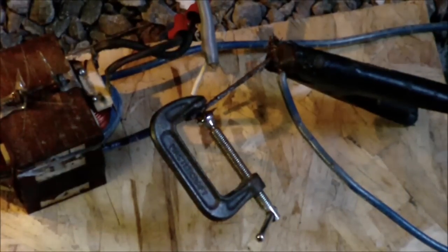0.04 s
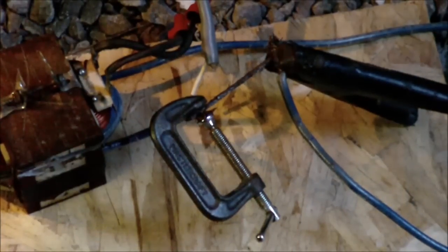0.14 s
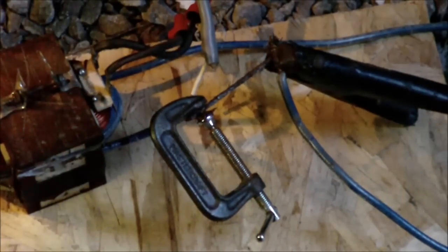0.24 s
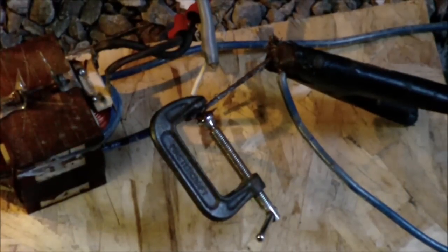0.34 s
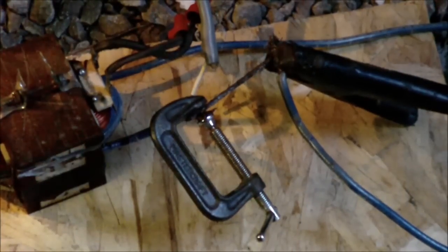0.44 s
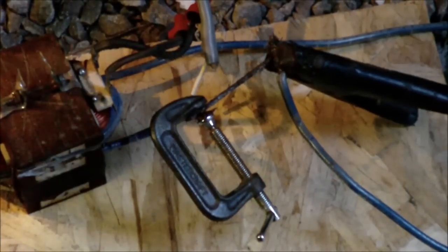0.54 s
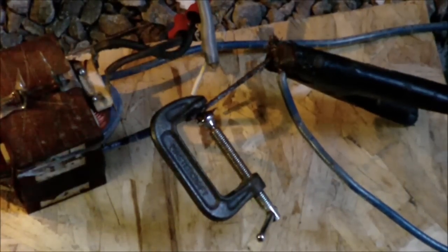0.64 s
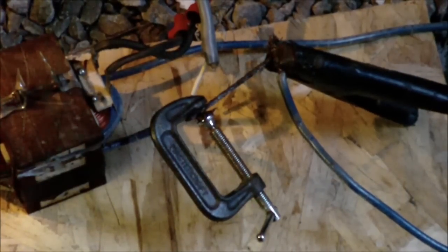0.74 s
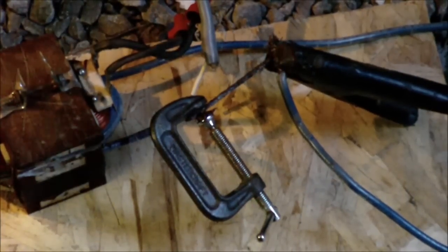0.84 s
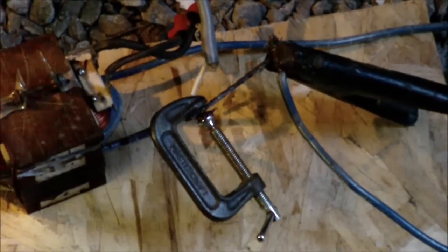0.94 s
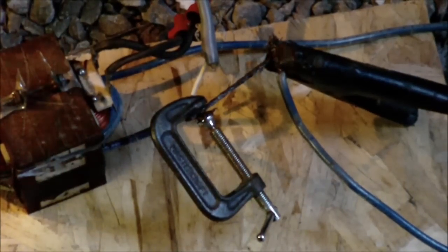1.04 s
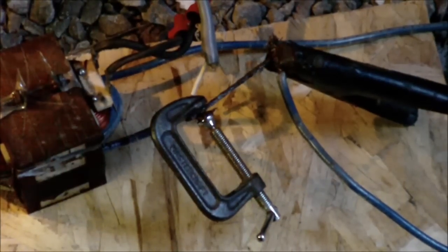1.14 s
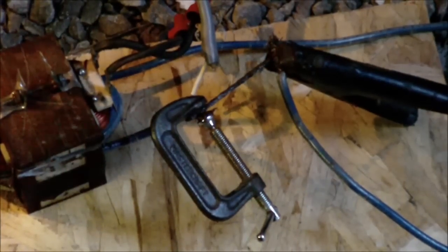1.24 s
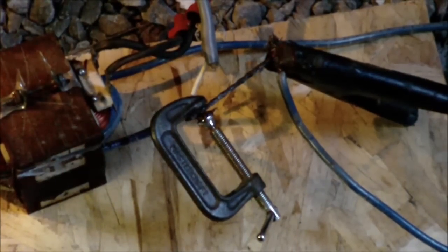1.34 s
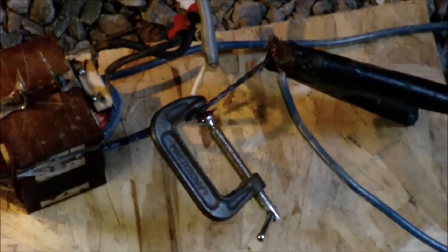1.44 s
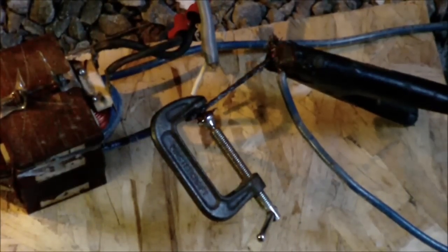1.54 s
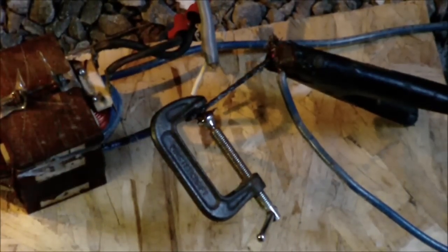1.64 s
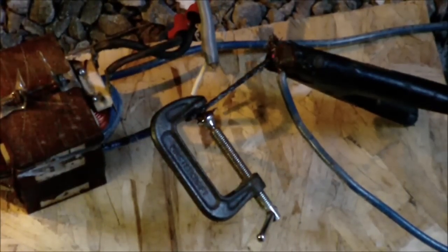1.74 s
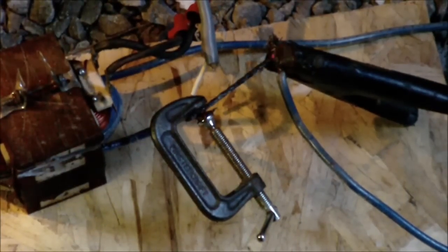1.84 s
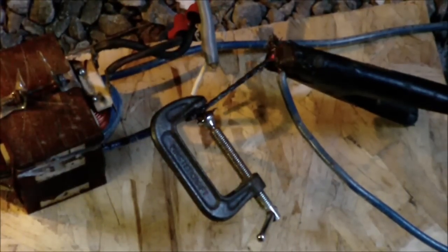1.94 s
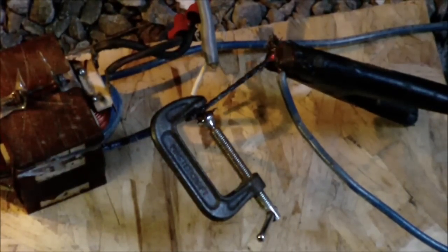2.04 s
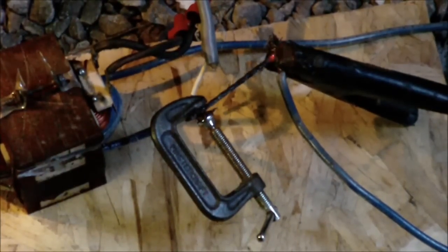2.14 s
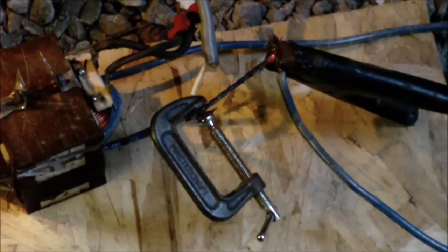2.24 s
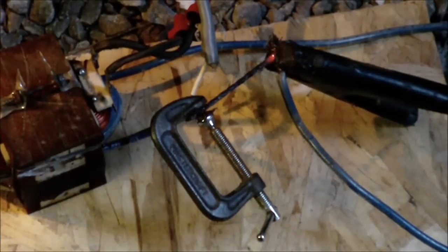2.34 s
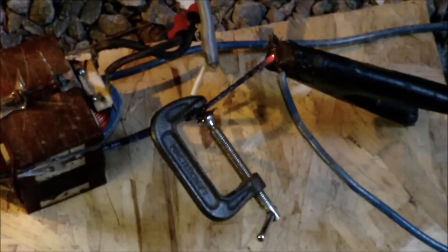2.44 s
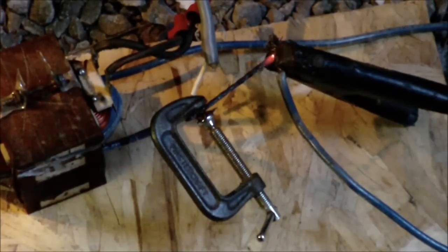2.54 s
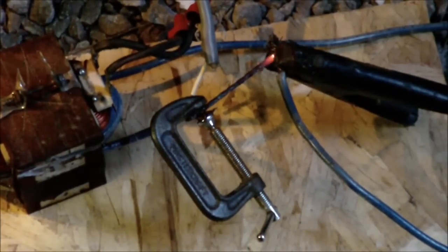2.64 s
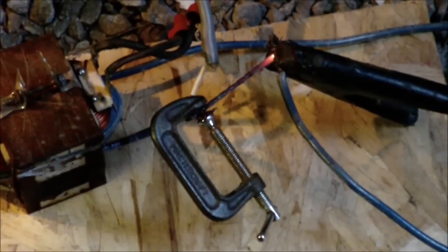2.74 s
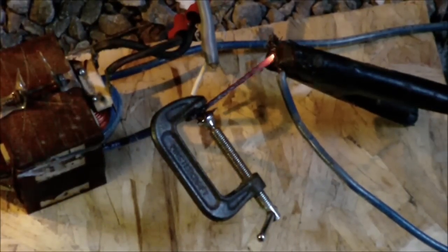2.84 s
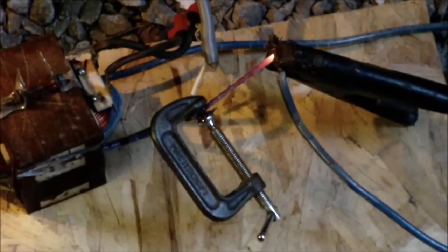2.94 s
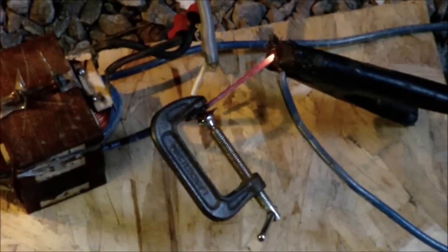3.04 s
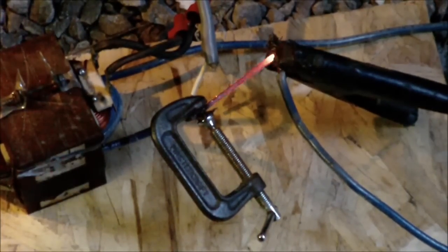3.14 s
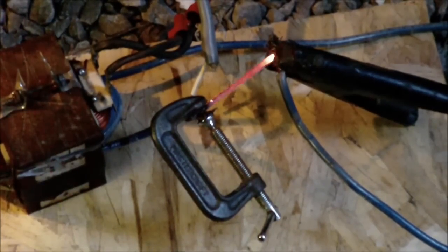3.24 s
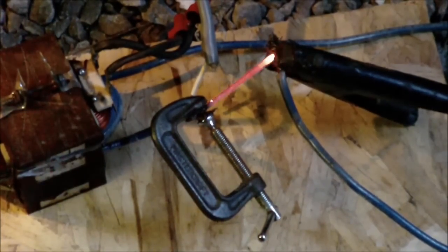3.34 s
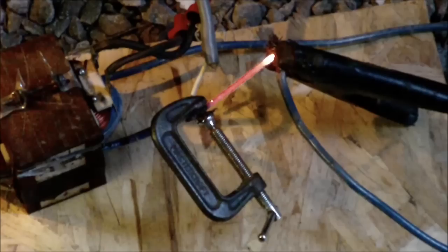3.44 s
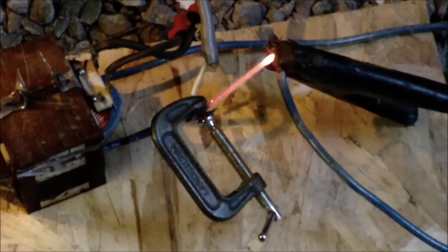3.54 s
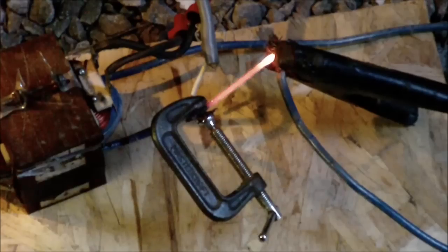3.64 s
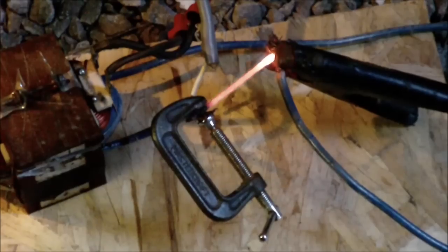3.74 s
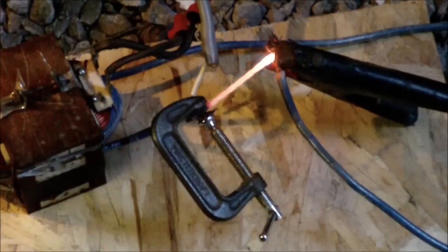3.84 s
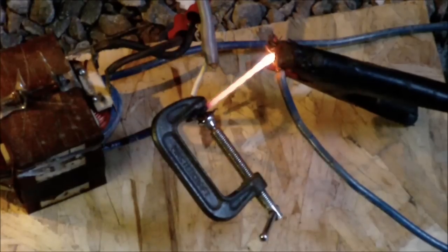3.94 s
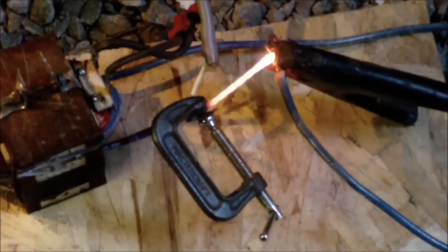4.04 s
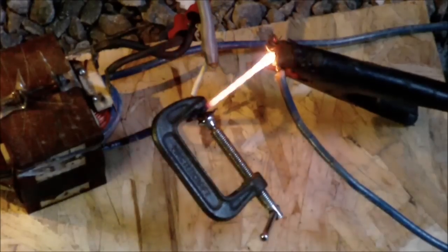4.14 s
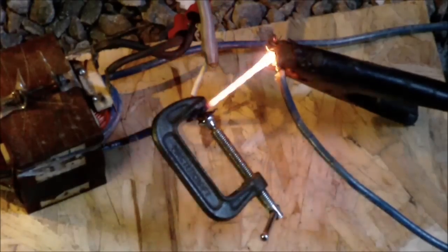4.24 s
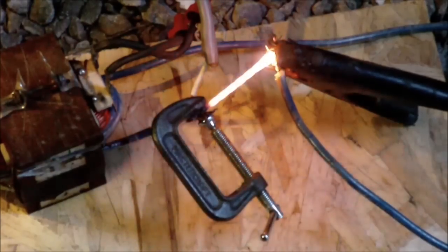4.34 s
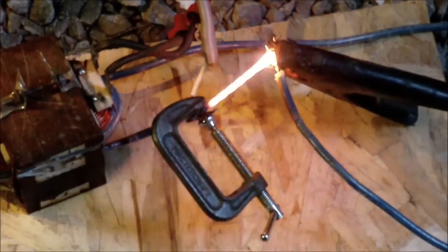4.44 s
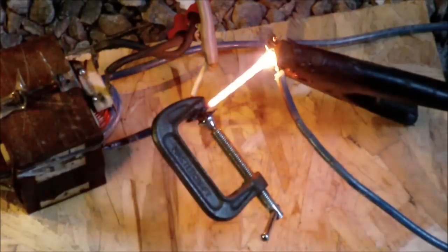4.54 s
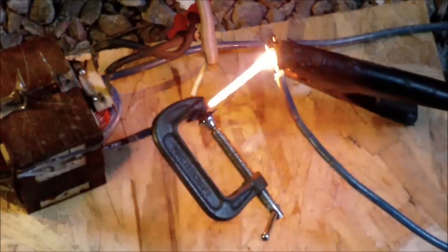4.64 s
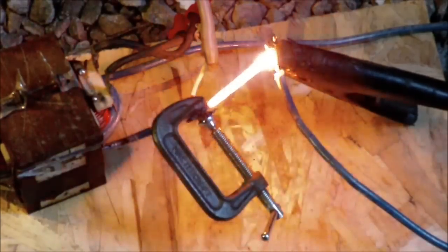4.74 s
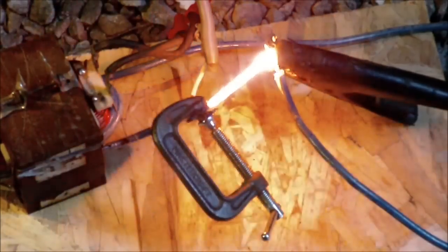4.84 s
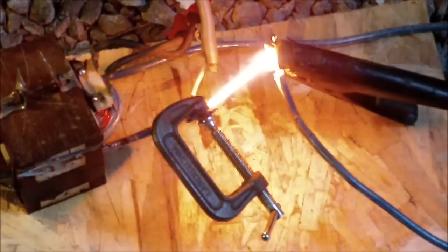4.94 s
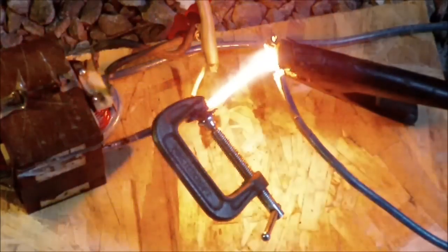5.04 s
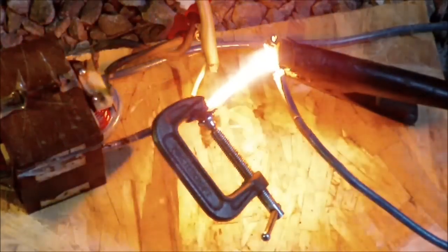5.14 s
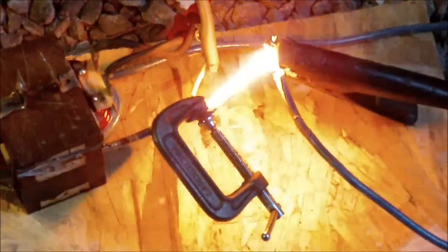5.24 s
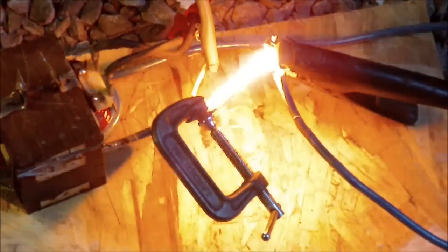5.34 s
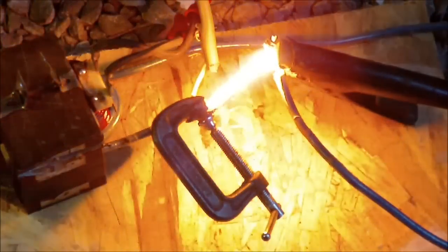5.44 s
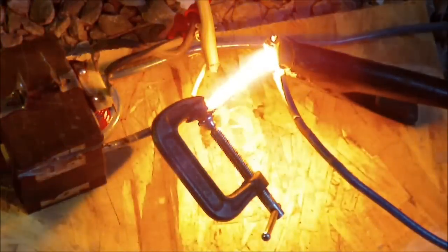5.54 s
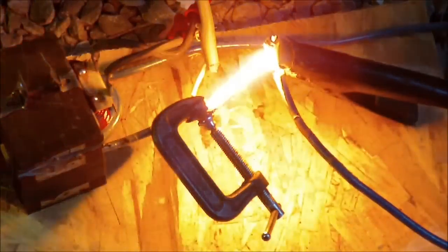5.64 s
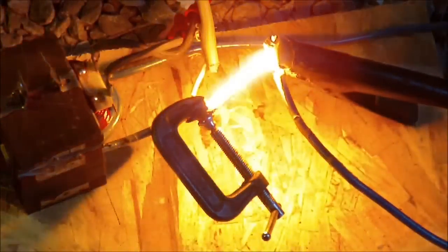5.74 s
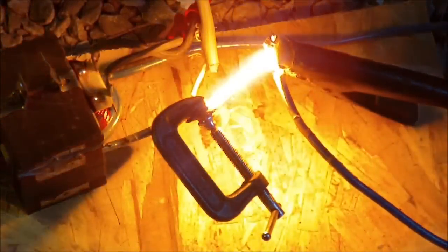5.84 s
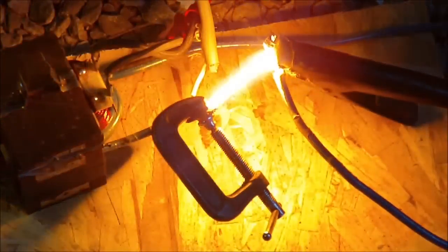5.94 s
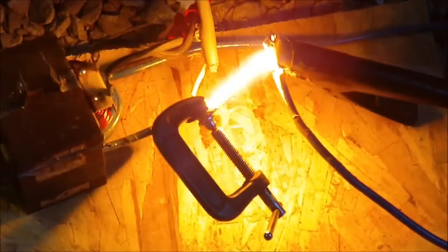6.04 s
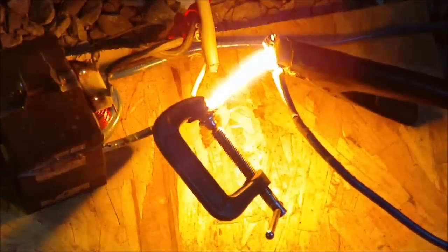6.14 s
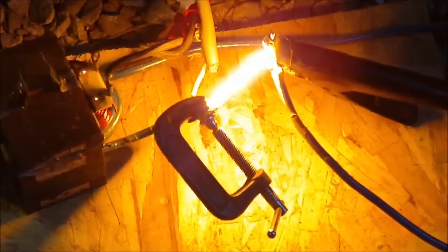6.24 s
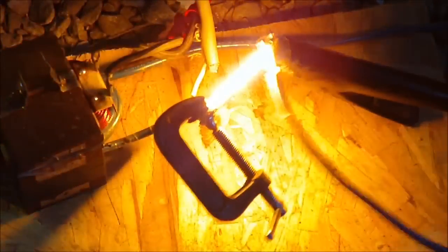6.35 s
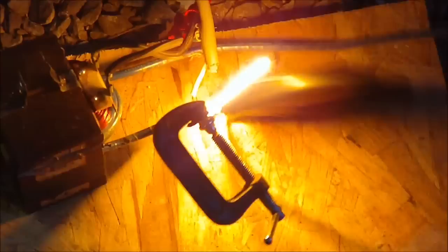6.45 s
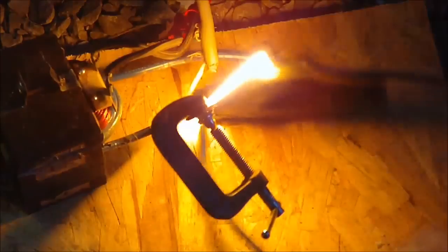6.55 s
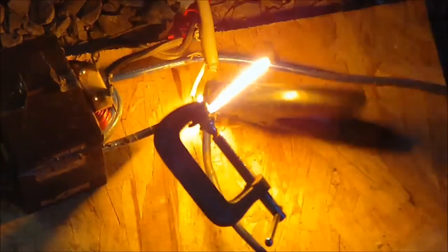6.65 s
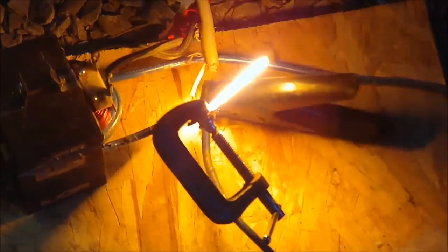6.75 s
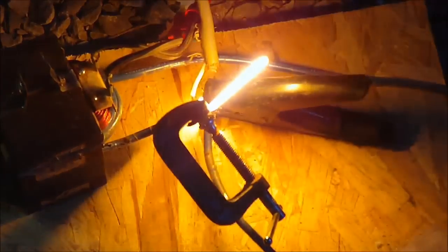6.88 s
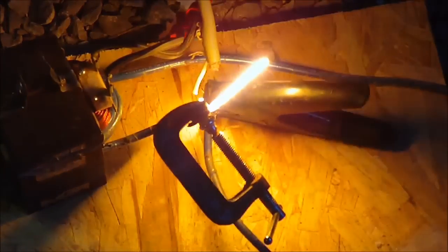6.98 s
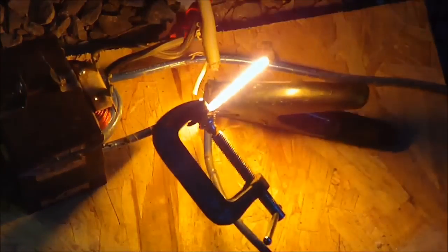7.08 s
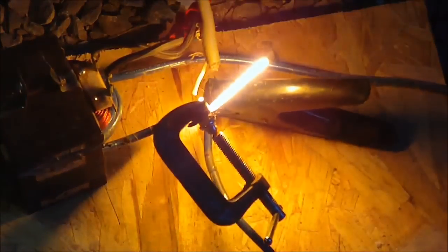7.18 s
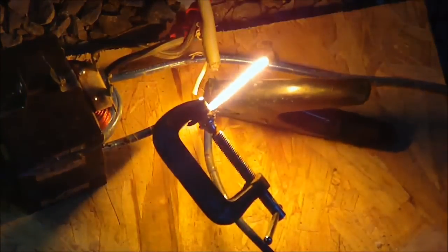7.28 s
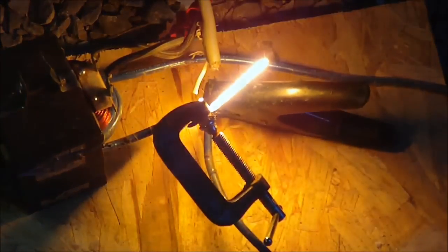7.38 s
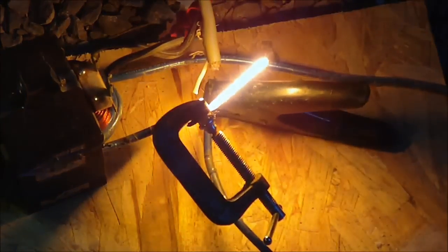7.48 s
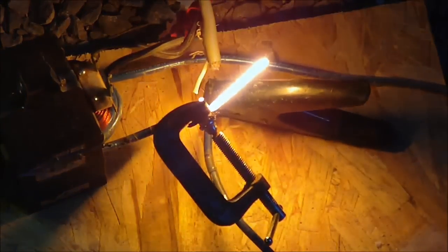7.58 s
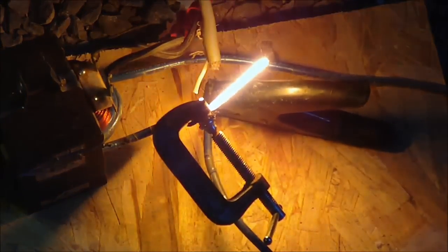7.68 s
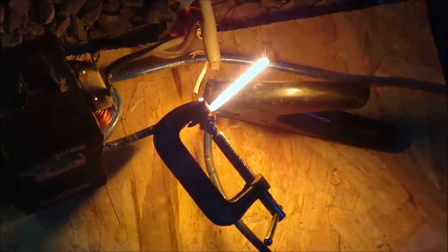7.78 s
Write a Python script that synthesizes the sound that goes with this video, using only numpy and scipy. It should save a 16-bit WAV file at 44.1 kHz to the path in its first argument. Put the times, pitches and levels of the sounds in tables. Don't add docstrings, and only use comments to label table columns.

```python
import sys
import numpy as np
from scipy import signal
from scipy.fft import rfft, irfft
from scipy.io import wavfile
from scipy.ndimage import uniform_filter1d

SR = 44100
rng = np.random.default_rng(int(sys.argv[2]) if len(sys.argv) > 2 else 0)


def voltage_ratio(decibels):
    exponent = np.asarray(decibels, float) / 20
    return 10 ** exponent


def digitize_waveform(pressure):
    field = np.atleast_2d(pressure).T
    bounded = np.clip(field, -1, 1)
    quanta = np.round(bounded * 32767).astype(np.int16)
    wavfile.write(sys.argv[1], SR, quanta)


N = 344587

BREAK_S, OFF_S = 6.404, 6.874

MAINS_HZ = 60
CYCLE = SR // MAINS_HZ
# even multiple of the mains, then level in dB under cold load, hot load and no load.
HUM_LINES = [(4, -86, -83.5, -78), (6, -68, -64, -78.5), (8, -46.5, -40.5, -40.5), (10, -68, -62.5, -50.5),
             (12, -65.5, -60, -52.5), (14, -72, -65.5, -65), (16, -80, -76, -63.5), (18, -67, -65.5, -48.5),
             (20, -67.5, -62, -67), (22, -80.5, -70.5, -55.5), (24, -69, -112, -56),
             (26, -76.5, -61.5, -63), (28, -80.5, -71.5, -56.5), (30, -70, -62.5, -57.5),
             (32, -77, -69.5, -54), (34, -85.5, -69, -54.5), (36, -85, -70.5, -52.5), (38, -76.5, -83, -53),
             (40, -79, -68.5, -49.5), (42, -85, -70, -63.5), (44, -89, -70, -53.5), (46, -94, -74.5, -56.5),
             (48, -79, -78, -67), (50, -100, -85.5, -53), (52, -99, -75.5, -71), (54, -80, -78.5, -56.5),
             (56, -78, -76, -57.5), (58, -110, -97, -56), (60, -86, -69, -49), (62, -76.5, -70.5, -55)]
FLIPPING_LINES = (18, 24)
# frequency in Hz, level in dB under cold, hot and no load.
RATTLE_ENVELOPE = [(3800, -84, -80, -60), (4350, -86, -86, -59), (4750, -84, -83, -59),
                   (5300, -88, -88, -65), (6000, -90, -86, -63), (6700, -89, -83, -61),
                   (7300, -90, -86, -66), (7700, -90, -91, -66), (8300, -89, -88, -63),
                   (9000, -91, -91, -71), (9800, -89, -87, -68), (11000, -94, -93, -75),
                   (13000, -99, -99, -81), (15500, -106, -106, -88)]
# odd multiple of the mains, level in dB.
SLAP_LINES = [(5, -81), (7, -63), (9, -49), (11, -77), (13, -67), (15, -72.5), (17, -58), (19, -115),
              (21, -75), (23, -59), (25, -70), (27, -104), (29, -71.5), (31, -90), (33, -82.5), (35, -73.5),
              (37, -76), (39, -78.5), (41, -75), (43, -74.5), (45, -110), (47, -73), (49, -87), (51, -80),
              (53, -92), (55, -83), (57, -82)]
# start and end in seconds, strength in dB, rise and fall in seconds.
SLAP_SPELLS = [
    (0, 0.26, -4, 0.0066, 0.02),
    (.5, 1.53, -6, 0.049, 0.13),
    (2.0, 2.61, -18.5, 0.04, .04),
    (3, 3.14, -22, .04, .05),
]
# heat from 0 to 1, heat range, centre in Hz, width in Hz, boost in dB.
BUZZING_PLATES = [
    (.24, 0.2, 5870, 280, 8),
    (.2, 0.11, 6650, 300, 4),
    (.75, 0.14, 2560, 200, 3),
    (.78, .15, 3800, 250, 0.5),
    (.93, .06, 6890, 297.8, 1.5),
    (.96, 0.042, 4000, 350, 5.5),
]
SEATED_DB = -32
HALF_HOT_S, WARMING_S, HOT_SAG_DB = 3.55, 0.96, -2.8
COLD_ROUGH, STEADY_S = 0.057, 1.2
CHATTER_DB, CHATTER_ROUGH = -10.5, 0.14
FREE_DB, FREE_START_DB, FREE_RISE_S = -1, -6, 0.057
FREE_ROUGH, JOLT_ROUGH, JOLT_S = 0.1, 0.45, 0.07

# start and end in seconds, rise and fall in seconds.
SIZZLE_SPELL = (0.36, .725, .012, 0.0099)
SIZZLE_DB, SIMMER_DB, SIMMER_FADE_DB_PER_S = -59, -70.5, 3.5
# start in seconds, peak in dB, centre in Hz, overtone level in dB.
NAIL_TICKS = [(0.165, -39.5, 2280, -5.5), (0.3148, -46.5, 2580, -6), (0.527, -42.5, 2080, -12),
              (.665, -45.5, 2570, 1.5), (0.821, -45.5, 2530, -2), (0.8585, -48, 1880, -18),
              (1.1887, -48, 2100, -20), (1.5588, -42.5, 1910, -20), (1.761, -61, 2600, -20),
              (2.8392, -44, 2400, -4.5), (3.8618, -42, 2400, 0.5), (4.0628, -38, 2070, -25),
              (4.465, -47, 2100, -23), (5.0893, -43, 2250, -10), (6.2418, -49, 2460, -11),
              (7.0955, -48.5, 2070, -25), (7.1, -45.5, 2200, -21), (7.397, -48, 2090, -23),
              (7.661, -48.5, 2000, -20)]
NAIL_MODES = [1130, 1380, 1670, 1880, 2110, 2330, 2600, 3010, 3500, 4100, 4800, 5300, 5900, 6700, 7600,
              8600, 10000, 12000]
TICK_OCTAVES, TICK_T60_S = 0.34, 0.039
OVERTONE_HZ, OVERTONE_OCTAVES, OVERTONE_T60_S = 5200, 0.31, 0.038
# start in seconds, snap level in dB, fizz level in dB, centre in Hz.
CONTACT_SPARKS = [
    (.257, -33.5, -46, 9700),
    (6.4037, -29.5, -41, 9970),
    (6.869, -60, -44, 12000),
]
SNAP_T60_S, FIZZ_T60_S, SPARK_OCTAVES = 0.01, 0.12, 0.2

# frequency in Hz, level in dB, t60 in seconds.
BOARD_MODES = [(546.3, -2.5, 0.068), (1214, -2, 0.05), (599.5, -7, 0.063), (674, -11, 0.11),
               (780, -11.5, 0.042), (1000, -10, .05), (1290, -21, 0.05), (1690, -28.5, 0.04),
               (2070, -27, 0.033), (2589, -37.5, .06), (195, -13, 0.13)]
# start in seconds, peak in dB.
LEAD_KNOCKS = [(6.4905, -20), (6.4945, -16.5), (6.4985, -2), (6.53, -16.5), (6.545, -24), (6.6825, -10.5),
               (6.6862, -14.5), (6.692, -19.5), (6.707, -36), (6.715, -27), (6.733, -32)]
HARDEST_S, SOFTER_S_PER_DB, SOFTEST_S = 0.0001, 0.00003, 0.0007
# start in seconds, level in dB, frequency in Hz.
LEAD_SCRAPES = [
    (6.722, -40, 737),
    (6.79, -41, 736),
]
SCRAPE_T60_S = 0.28
# start in seconds, peak in dB, centre in Hz, bright part in dB.
METAL_CLATTERS = [(6.4982, -16.5, 2080, -9.5), (6.876, -36.5, 2400, -9), (6.9227, -34.5, 1520, -3),
                  (6.929, -34.5, 800, -10), (6.935, -41.5, 2630, -10), (6.993, -44, 875, -16),
                  (7.002, -42, 1000, 0), (7.015, -42.5, 750, -13), (7.181, -56, 1000, -18),
                  (7.24, -61, 795, -20), (7.317, -62, 1500, -0.5), (7.459, -67.5, 2000, 10.5),
                  (7.5, -61, 2500, 4), (7.531, -51.5, 940, -3)]
CLATTER_OCTAVES, CLATTER_T60_S, BRIGHT_HZ, BRIGHT_T60_S = 0.54, 0.14, 7800, 0.08
# frequency in Hz, level in dB, t60 in seconds.
CLAMP_MODES = [
    (497, -51, 1.45),
    (472, -60, 0.97),
    (1930, -73.5, 3.5),
    (9710, -53, 0.28),
]
# centre in Hz, peak in dB, t60 in seconds.
TOOL_CRACK = [
    (903, -11, 0.17),
    (2120, -9.5, .12),
    (4000, -12.5, 0.087),
    (8100, -13.5, 0.12),
]
CRACK_S, CRACK_OCTAVES, CRACK_LAG_CYCLES = 7.7622, 0.37, 2.2

# frequency in Hz, density in dB per Hz.
AIR_SPECTRUM = [(20, -13), (100, -18.5), (200, -17), (330, -5), (500, -5), (900, -4.5), (2000, -11.5),
                (5000, -9.5), (9000, -14), (15500, -18)]
AIR_DB, EDGE_HZ = -67.5, 15800


def transformer(scatter_db=8, drift_db=4.5, smear_s=0.0052, late_s=-0.0014):
    t = np.arange(N // CYCLE + 2) / MAINS_HZ
    k = np.arange(CYCLE // 2 + 1)
    line_hz = k * MAINS_HZ
    level_db = np.array(curves(RATTLE_ENVELOPE, line_hz))
    level_db += scatter_db * (0.3 - rng.random((3, len(k))) ** 1.5)
    level_db[:, (k % 2 == 1) | (k < HUM_LINES[0][0])] = -200
    for multiple, *db in HUM_LINES:
        level_db[:, round(multiple)] = db
    cold, hot, free = voltage_ratio(level_db)
    cold[list(FLIPPING_LINES)] *= -1
    loose = np.zeros(len(k))
    for multiple, db in SLAP_LINES:
        loose[round(multiple)] = voltage_ratio(db)

    delay = late_s + smear_s * uniform_filter1d(rng.random(len(k)) ** 2, size=3) + k * 6e-6
    phase = np.exp(-2j * np.pi * np.cumsum(delay * MAINS_HZ) + 0.6j * rng.standard_normal(len(k)))

    drift = uniform_filter1d(rng.standard_normal((len(t), len(k))), 30, 0)
    drift = evened(uniform_filter1d(drift, 24, 0))
    drift = evened(uniform_filter1d(drift, 4, 1))
    drift = voltage_ratio(drift_db * np.minimum(drift + 0.2, 1.1) * np.clip(line_hz / 5000, 0, 1) ** 2)
    unsteady = 0.6 + (line_hz / 3300) ** 1.3

    t = t[:, None]
    heat = spell(t, HALF_HOT_S, np.inf, WARMING_S, 1)
    load_db = HOT_SAG_DB * heat ** 2
    rough = COLD_ROUGH * np.maximum(1 - (t / STEADY_S) ** 3, 0)
    slap = voltage_ratio(SEATED_DB)
    for start_s, end_s, db, rise_s, fall_s in SLAP_SPELLS:
        slap = slap + voltage_ratio(db) * spell(t, start_s, end_s, rise_s, fall_s)
    buzz_db, chatter = 0, 0
    for mid, span, hz, width_hz, db in BUZZING_PLATES:
        buzz = np.exp(-((heat - mid) / span) ** 2 - ((line_hz - hz) / width_hz) ** 2)
        buzz_db = buzz_db + db * buzz
        chatter = chatter + buzz
    loaded = voltage_ratio(load_db + buzz_db) * ((1 - heat) * cold + heat * hot) + slap * loose
    loaded = loaded + voltage_ratio(CHATTER_DB) * chatter * np.roll(loaded, 1, 1)
    rough = rough + CHATTER_ROUGH * chatter

    since = np.maximum(t - BREAK_S, 0)
    free_db = FREE_DB + FREE_START_DB * np.exp(-since / FREE_RISE_S)
    free_rough = FREE_ROUGH + JOLT_ROUGH * np.exp(-since / JOLT_S)
    unloaded = voltage_ratio(free_db) * (free + voltage_ratio(-25) * np.roll(free, 1))

    hum = cycles(loaded * drift * phase, rough * unsteady)
    rattle = cycles(unloaded * np.cbrt(drift) * phase, free_rough * unsteady)
    return hum * gate(-1, BREAK_S, 0.001, 0.006) + rattle * gate(BREAK_S, OFF_S, 0.004, 0.007)


def cycles(lines, rough):
    wobble = rng.standard_normal(lines.shape + (2,)) @ [1, 1j]
    wobble = (wobble + np.roll(wobble, 2, 1) + np.roll(wobble, 4, 1)) / np.sqrt(3)
    period = irfft(lines * (1 + rough * wobble), CYCLE) * CYCLE / np.sqrt(2)
    fade = np.arange(CYCLE) / CYCLE
    return (period[:-1] * (1 - fade) + period[1:] * fade).ravel()[:N]


def live_rasp():
    rasp = coloured(lambda hz: hz / (1 + (hz / 2500) ** 6.6))
    return voltage_ratio(-73.5) * rasp * gate(-1, OFF_S, 0.001, 0.11)


def sizzle(centre_hz=10500, spread=0.34):
    def colour(hz):
        return np.exp(-0.5 * (np.log2(hz / centre_hz) / spread) ** 2) + 0.32 * (hz > 2000)
    hiss = coloured(colour)
    grain = voltage_ratio(1.6 * evened(uniform_filter1d(rng.standard_normal(N), size=150)))
    t = np.arange(N) / SR
    simmer = voltage_ratio(SIMMER_DB - SIMMER_FADE_DB_PER_S * np.minimum(t, 1))
    burst = voltage_ratio(SIZZLE_DB - 3.5) * spell(t, *SIZZLE_SPELL)
    return (simmer + burst) * evened(hiss * grain)


def nail_ticks():
    rows = []
    for s, db, hz, bright_db in NAIL_TICKS:
        rows.append((s, db, hz, TICK_OCTAVES, TICK_T60_S))
        rows.append((s, db + bright_db, OVERTONE_HZ, OVERTONE_OCTAVES, OVERTONE_T60_S))
    return rows


def sparks():
    rows = []
    for s, snap_db, fizz_db, hz in CONTACT_SPARKS:
        rows.append((s, snap_db, hz, SPARK_OCTAVES, SNAP_T60_S))
        rows.append((s + 0.0018, fizz_db, hz, SPARK_OCTAVES, FIZZ_T60_S))
    return rows


def knock(db):
    contact_s = np.clip(HARDEST_S - SOFTER_S_PER_DB * db, 5e-5, SOFTEST_S)
    u = np.arange(200) / SR / contact_s
    sound = np.diff(signal.fftconvolve(ring(BOARD_MODES, 0.15), u * np.exp(-u)))
    return -voltage_ratio(db) * sound / abs(sound).max()


def scrape(db, hz):
    return ring([(hz, db, SCRAPE_T60_S), (1.2 * hz, db - 12, SCRAPE_T60_S)], 0.15)


def clatters():
    rows = []
    for s, db, hz, bright_db in METAL_CLATTERS:
        rows.append((s, db, hz, CLATTER_OCTAVES, CLATTER_T60_S))
        rows.append((s - 0.002, db + bright_db, BRIGHT_HZ, CLATTER_OCTAVES, BRIGHT_T60_S))
    return rows


def tool_crack():
    return [(CRACK_S + CRACK_LAG_CYCLES / hz, db, hz, CRACK_OCTAVES, t60) for hz, db, t60 in TOOL_CRACK]


def tick(modes_hz, sharp, length, db, hz, spread, t60):
    t = np.arange(length) / SR
    noise = rng.standard_normal(length)
    impacts = noise * abs(noise) * voltage_ratio(-60 * t / t60) * np.minimum(t / 0.00022, 1)
    impacts *= 1 + 1.5 * np.exp(-t / 0.0015)
    sound = np.zeros(length)
    for mode_hz, chance in zip(modes_hz, rng.standard_normal(len(modes_hz))):
        mode = signal.iirpeak(mode_hz, sharp, SR)
        nearness = np.exp(-0.5 * (np.log2(mode_hz / hz) / spread) ** 2)
        share = nearness * voltage_ratio(1.5 * chance) / np.sqrt(mode_hz)
        sound += share * signal.lfilter(*mode, signal.lfilter(*mode, impacts))
    onset = sound[:round(t60 * SR / 6) + 40]
    return voltage_ratio(db - 11.0) * sound / np.sqrt(np.mean(onset ** 2))


def add_ticks(mix, rows, modes_hz, sharp, length):
    for s, *blow in rows:
        add(mix, s, tick(modes_hz, sharp, length, *blow))


def ring(modes, length_s):
    t = np.arange(round(length_s * SR)) / SR
    return sum(voltage_ratio(db - 60 * t / t60) * np.sin(2 * np.pi * hz * t) for hz, db, t60 in modes)


def yard(x, t60=0.15, wet_db=-21):
    t = np.arange(SR // 3) / SR
    sparse = rng.standard_normal(len(t)) * (rng.random(len(t)) < 0.05)
    taps = sparse * voltage_ratio(-60 * t / t60) * (t > 0.004)
    return x + voltage_ratio(wet_db) * signal.oaconvolve(x, taps / np.linalg.norm(taps))[:N]


def air():
    f, db = np.transpose(AIR_SPECTRUM)
    return voltage_ratio(AIR_DB) * coloured(lambda hz: voltage_ratio(np.interp(np.log(hz), np.log(f), db)))


def coloured(gain):
    hz = np.fft.rfftfreq(N, 1 / SR)
    return evened(irfft(rfft(rng.standard_normal(N)) * gain(hz + 1), N))


def evened(x):
    return x / np.sqrt(np.mean(x ** 2) + 1e-20)


def curves(rows, t):
    s, *columns = np.transpose(rows)
    return [np.interp(t, s, c) for c in columns]


def spell(t, start_s, end_s, rise_s, fall_s):
    rise = 1 + np.tanh((t - start_s) / (2 * rise_s))
    fall = 1 - np.tanh((t - end_s) / (2 * fall_s))
    return rise * fall / 4


def gate(on_s, off_s, rise_s, fall_s):
    t = np.arange(N) / SR
    rise = 1 - np.exp(-np.maximum(t - on_s, 0) / rise_s)
    return rise * np.exp(-np.maximum(t - off_s, 0) / fall_s)


def add(mix, s, sound):
    part = mix[round(s * SR):][:len(sound)]
    part += sound[:len(part)]


def scene():
    hits = np.zeros(N)
    for s, db in LEAD_KNOCKS:
        add(hits, s, knock(db))
    add_ticks(hits, nail_ticks(), NAIL_MODES, 7, 3000 - len(NAIL_MODES))
    for s, db, hz in LEAD_SCRAPES:
        add(hits, s, scrape(db, hz))
    junk_hz = np.geomspace(300, 15000, num=36)
    add_ticks(hits, tool_crack() + sparks() + clatters(), junk_hz, 5, 9000 - len(junk_hz))
    hits = signal.sosfilt(signal.butter(2, 330, "high", fs=SR, output="sos"), hits)
    add(hits, OFF_S, ring(CLAMP_MODES, 0.92))
    return (transformer() + live_rasp() + yard(hits) + sizzle())[None]


def roll_off(x):
    return signal.sosfilt(signal.butter(12, 16460, fs=SR, output="sos"), x)


def record(dry):
    thin = signal.sosfilt(signal.butter(4, 240, "high", fs=SR, output="sos"), dry)
    edge = signal.firwin(255, EDGE_HZ, fs=SR)
    mix = signal.oaconvolve(thin + air(), edge[None], "same")
    return roll_off(mix)


dry = scene()
out = record(dry)
digitize_waveform(out)
```